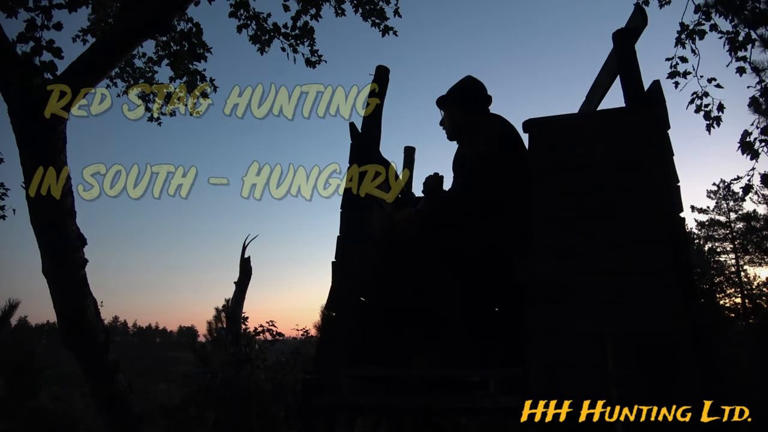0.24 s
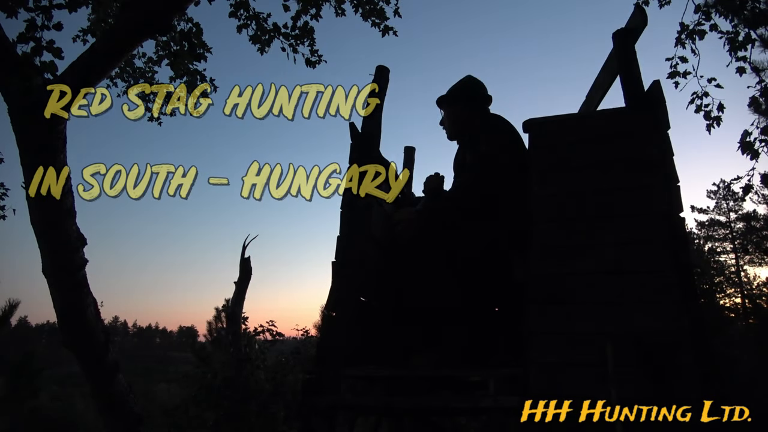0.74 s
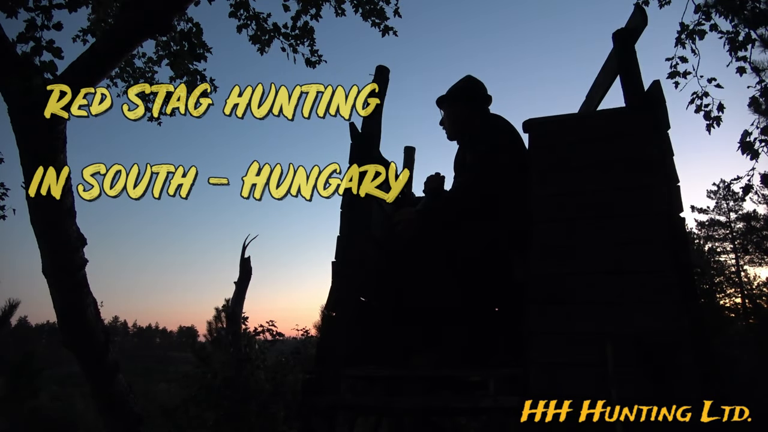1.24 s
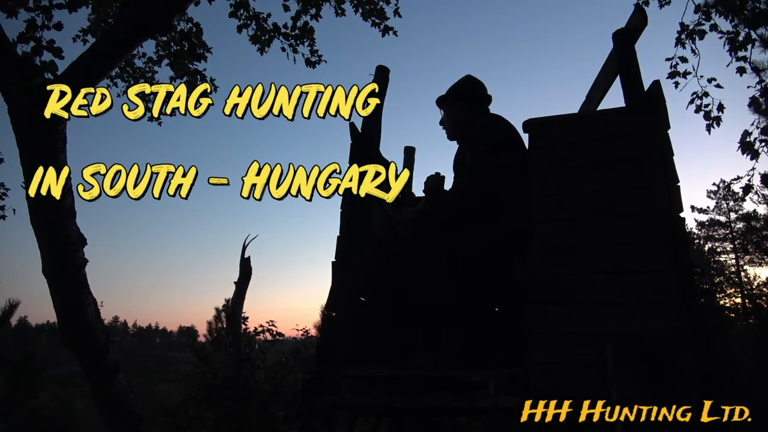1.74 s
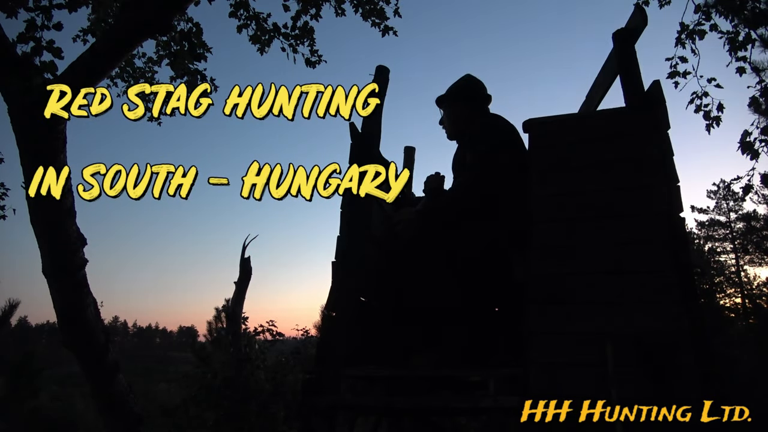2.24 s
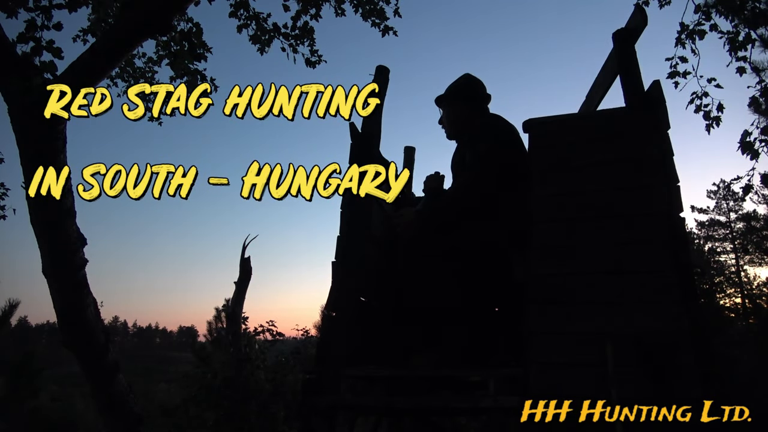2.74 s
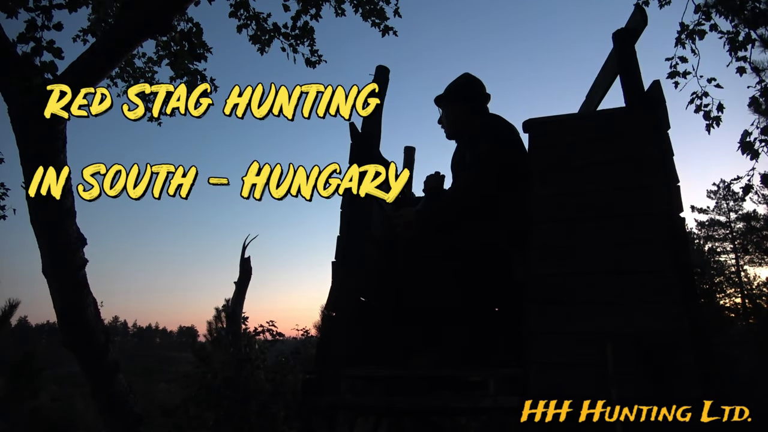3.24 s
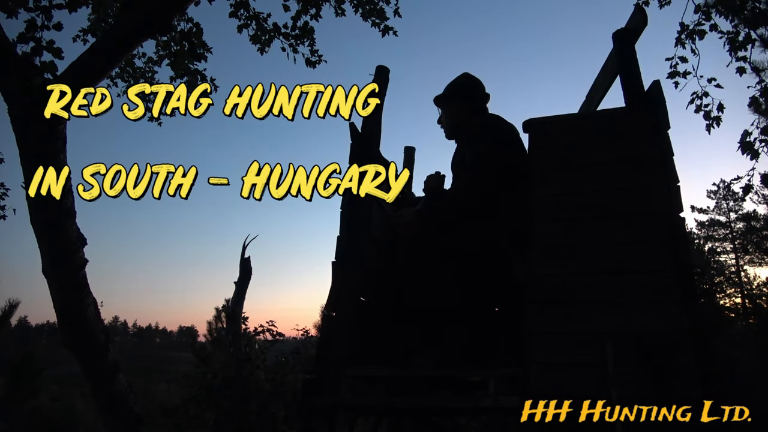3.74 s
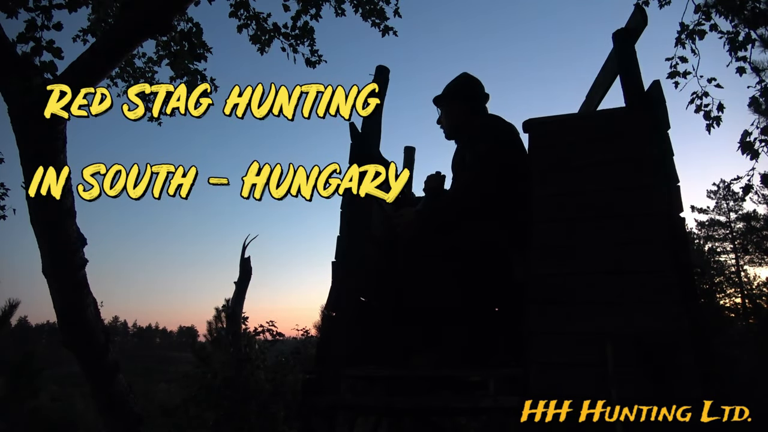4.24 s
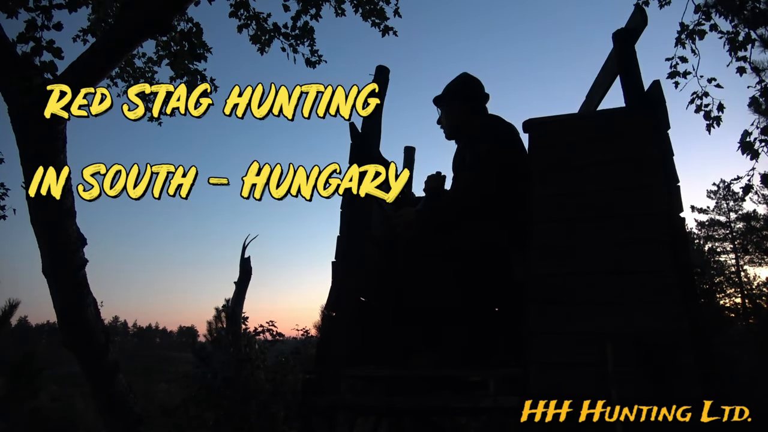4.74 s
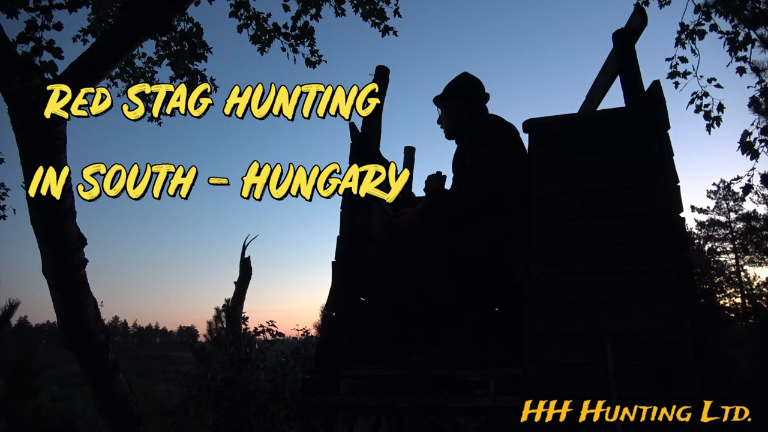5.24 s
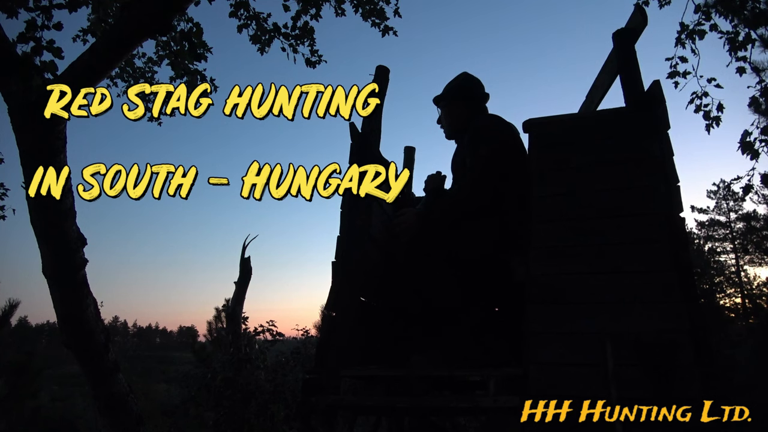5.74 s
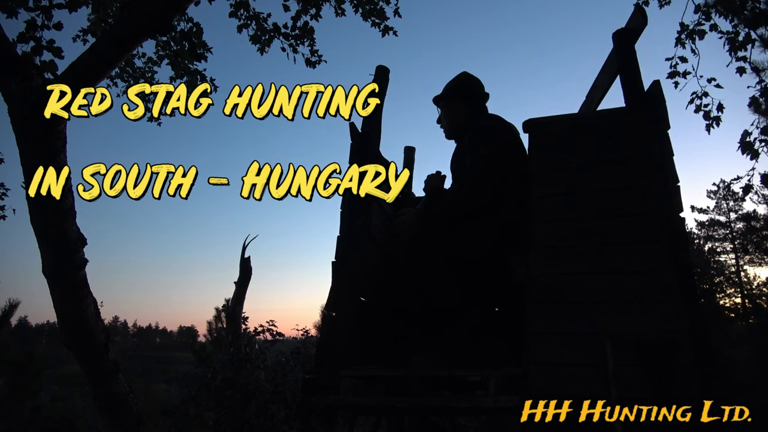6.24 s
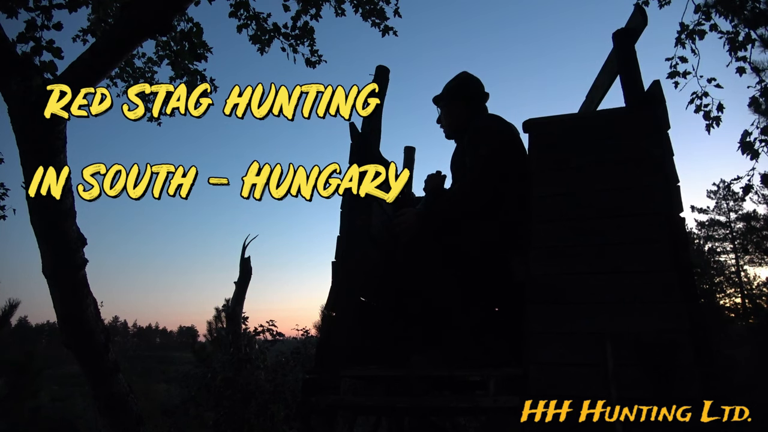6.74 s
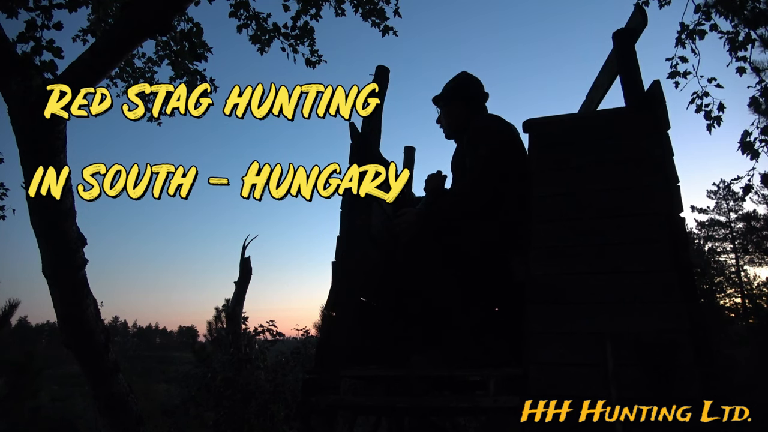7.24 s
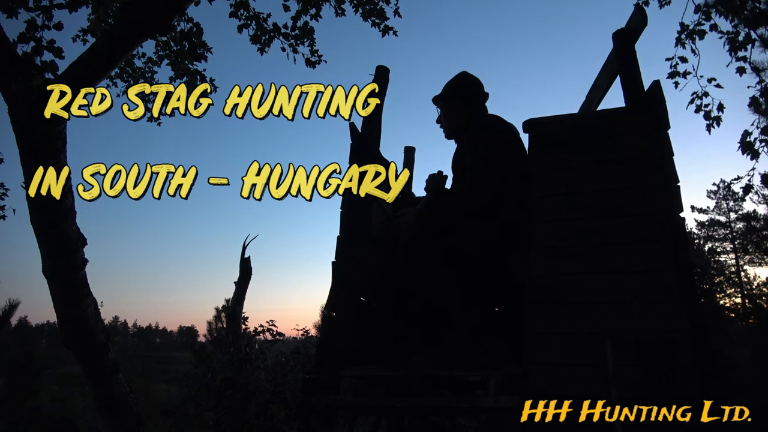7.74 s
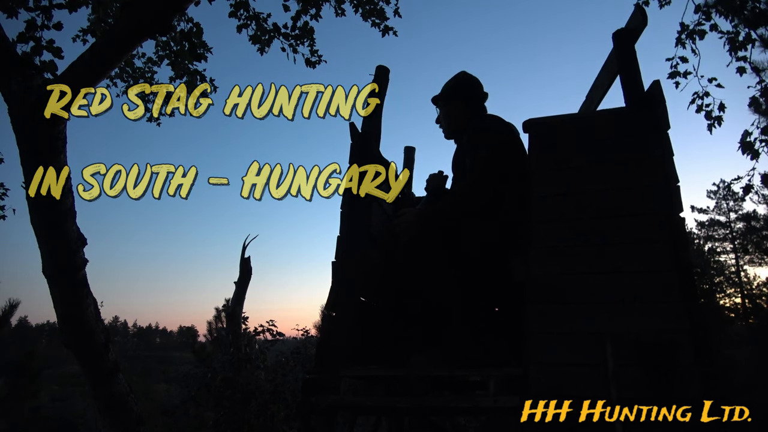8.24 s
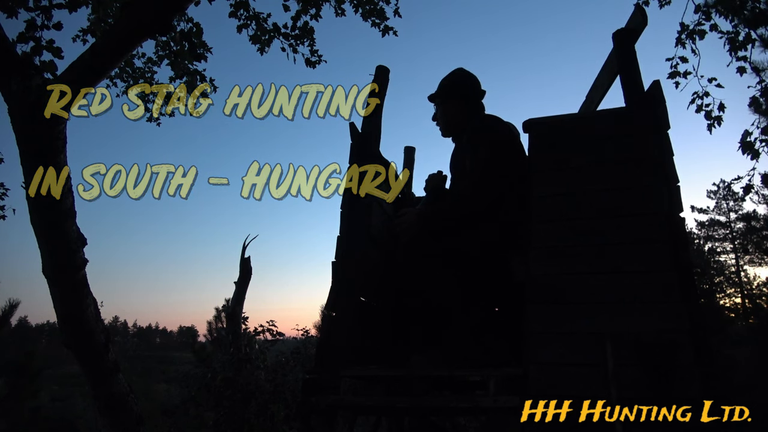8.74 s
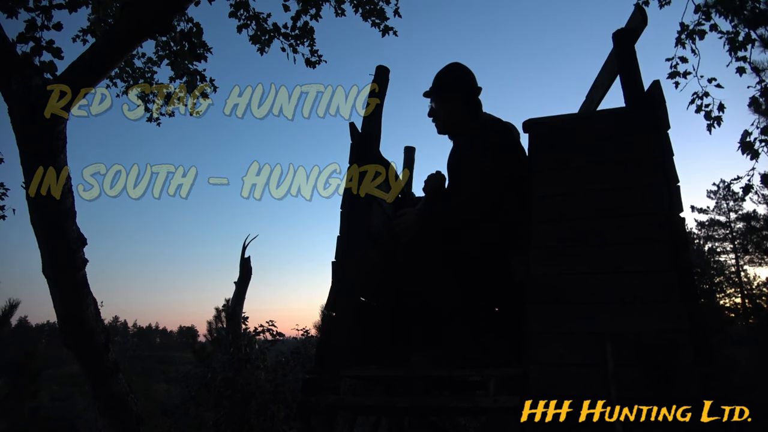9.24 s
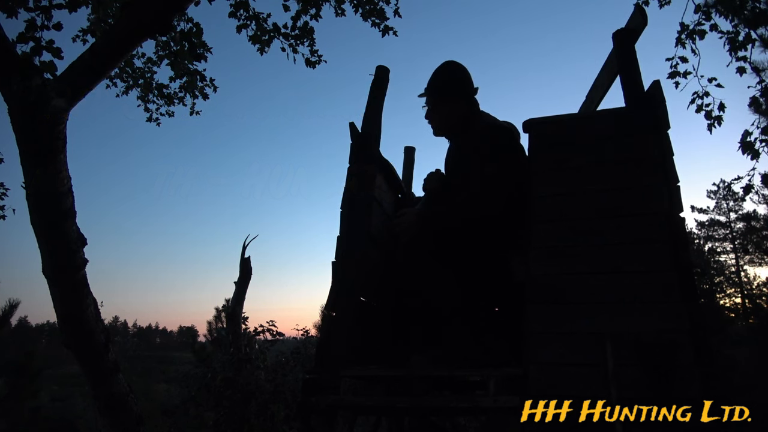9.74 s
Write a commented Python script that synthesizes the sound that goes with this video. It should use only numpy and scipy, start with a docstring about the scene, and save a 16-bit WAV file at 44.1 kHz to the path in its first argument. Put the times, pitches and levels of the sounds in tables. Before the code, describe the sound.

Outdoors in a wood, air rumbles steadily on the microphone while crickets trill faintly. From a distance a stag gives two rasping roars, then a drawn-out groan, then four short throaty roars in a row, each dropping in pitch at its end and echoing lightly through the trees. Nearby, twigs now and then tick or snap quietly, and there are a few soft rustles.

```python
"""Seven roars of a red deer stag at a forest edge at dusk: two harsh ones, a long groan, four short ones.
His vocal folds pulse through a long throat, whose resonances (the pitches it boosts) sink as he
stretches his neck; the trees echo faintly. Close by are a low rumble of air, soft rustles,
tree crickets trilling with their wings, and a few ticks and snaps of twigs."""
import sys
import numpy as np
from scipy import signal
from scipy.fft import rfft, irfft
from scipy.io import wavfile
from scipy.ndimage import uniform_filter1d

SR = 44100
rng = np.random.default_rng(int(sys.argv[2]) if len(sys.argv) > 2 else 0)


def pcm_store(signal):
    """Save signal as 16-bit PCM."""
    levels = np.round(np.clip(np.atleast_2d(signal), -1, 1) * 32767)
    wavfile.write(sys.argv[1], SR, levels.astype(np.int16).T)


N = 440118
TIME = np.arange(N) / SR


def from_db(db):
    """Turn decibels into a gain."""
    return 10 ** (np.asarray(db) / 20)


def rms_one(x):
    """Scale a signal so that its average size (rms) is 1."""
    return x / np.sqrt(np.mean(x ** 2) + 1e-20)


def in_time(rows):
    """Join timed points with straight lines, one curve for each column after the time."""
    times, *columns = np.transpose(rows)
    return [np.interp(TIME, times, column) for column in columns]


def butter(x, hz, kind, order=2):
    """Keep the lows, the highs or a band; a higher order cuts more steeply."""
    sections = signal.butter(order, np.clip(hz, 10, .45 * SR), kind, fs=SR, output="sos")
    return signal.sosfilt(sections, x + 1e-18)


def drift(rate):
    """A random wobble of average size 1 that turns about `rate` times a second."""
    return rms_one(np.interp(TIME * rate, np.arange(8000), rng.standard_normal(8000)))


def noise(spectrum):
    """Noise of average size 1, coloured by rows of f/Hz, relative level/dB."""
    hz, db = np.transpose(spectrum)
    bins = np.maximum(np.fft.rfftfreq(N, 1 / SR), 1)
    colour = from_db(np.interp(np.log(bins), np.log(hz), db))
    return rms_one(irfft(rfft(rng.standard_normal(N)) * colour, N))


def resonate(x, hz, width_hz):
    """Make a signal ring at one pitch; a narrow width rings longer."""
    r = np.exp(-np.pi * width_hz / SR)
    feedback = [1, -2 * r * np.cos(2 * np.pi * hz / SR), r * r]
    return (1 - r * r) / 2 * signal.lfilter([1, 0, -1], feedback, x)


def bell(hz, centre_hz, width_hz, steep=1.8):
    """How much a resonance lets through: 1 at its centre, less to either side."""
    return (1 + (2 * (hz - centre_hz) / width_hz) ** 2) ** (-steep / 2)


def air(drone_db=-24, hush_db=-50):
    """Moving air rumbles under a steady low drone and the hush of the wood."""
    # colours of the rumble and the hush: f/Hz, relative level/dB
    rumble_colour = [(7.1, -19.5), (12, 3.5), (24, 1), (36, -3.5), (52, -1.15), (67, -12), (91, -21),
                     (151, -21), (240, -36), (310, -54), (530, -120)]
    hush_colour = [(120, -38.5), (200, -0.5), (244, -11.5), (371, -7), (506, -16), (890, -18), (1010, -26),
                   (1190, -21), (1560, -30.5), (1710, -26), (1950, -34.5), (2750, -31.5), (3010, -36.5),
                   (15500, -42.5)]
    # the rumble's slow rise and fall: t/s, gain/dB
    rumble_curve = [(0, -27), (1.2, -23.5), (4.3, -22.5), (6.8, -23), (7.2, -25.5), (9.98, -25.5)]
    low_noise = butter(noise(rumble_colour), 233, "low", order=4)
    rumble = from_db(in_time(rumble_curve)[0]) * butter(low_noise, 80.6, "low", order=5)
    drone = from_db(drone_db) * butter(low_noise, 83.2, "high", order=5)
    hush = from_db(hush_db) * butter(noise(hush_colour), 157, "high")
    return rumble + drone + hush


def rustling(grain_db=1.0):
    """Soft, grainy rustles swell and die away."""
    # rustles: t/s, level/dB, time to rise 20 dB/s, time to fall 20 dB/s (negative: keeps growing)
    rustles = [(1.62, -53.5, 0.5645, 1.7), (6.31, -58, 0.5, 0.7), (7.42, -56, 0.03, 0.4),
               (9.0, -62.5, 2.3, 0.5), (9.95, -55.5, 0.95, -3.5)]
    # their colour: f/Hz, relative level/dB
    colour = [(300, -10), (700, 15), (1400, 9), (2500, 1.5), (4200, -1.5), (6500, -23), (11000, -8.5),
              (16000, -33)]
    swells = sum(from_db(db - 20 * np.maximum((at - TIME) / rise_s, (TIME - at) / fall_s))
                 for at, db, rise_s, fall_s in rustles)
    return swells * from_db(grain_db * drift(75)) * butter(noise(colour), 250, "high")


def crickets(strokes_per_s=40, waver=0.016, fade_s=0.056):
    """Tree crickets: each wing stroke is a short, nearly pure tone."""
    # trills: start/s, end/s, f/Hz, relative level/dB
    trills = [(-.1, 0.526, 2590, -63.5), (0.244, .82, 2760, -69), (1.547, 2.15, 2635, -65),
              (2.597, 3.195, 2770, -67.5), (8.219, 8.947, 2665, -67), (9.448, 10.006, 2793, -68.5)]
    out = np.zeros(N)
    for start, end, hz, db in trills:
        fade = np.clip(np.minimum(TIME - start, end - TIME) / fade_s, 0, 1)
        strokes = np.sin(np.pi * strokes_per_s * (TIME - start)) ** 2
        tone = np.sin(2 * np.pi * np.cumsum(hz * (1 + waver * drift(180))) / SR)
        out += 2 * from_db(db) * fade * strokes * tone
    return out


def bursts(times, levels_db, t60):
    """Wood fibres give way in bursts of noise, each fading by 60 dB in t60 seconds."""
    out, t = np.zeros(N), TIME[:SR // 10]
    for start, db in zip(times, levels_db):
        at = int(start * SR)
        burst = from_db(db - 60 * t / t60) * rng.standard_normal(len(t))
        out[at:at + len(t)] += burst[:N - at]
    return out


def twig_ticks(ring_db=4, crackle_db=-9):
    """Each tick crackles and sets a twig ringing."""
    # ticks: t/s, relative level/dB
    ticks = [(4.274, -44.5), (4.366, -39.5), (4.432, -50.5), (4.4843, -47.5), (6.237, -47), (6.2892, -40),
             (6.4823, -42), (7.3347, -48), (9.074, -45)]
    # the twig's resonances: f/Hz, width/Hz, relative level/dB
    resonances = [(3740, 125, 5), (3973, 160, -13), (4750, 238.6, -25.5)]
    cracks = bursts(*np.transpose(ticks), t60=.025) + 1e-12 * rng.standard_normal(N)
    ring = sum(from_db(db + ring_db) * resonate(cracks, hz, width) for hz, width, db in resonances)
    return ring + from_db(crackle_db) * butter(cracks, [1500, 7000], "band")


def twig_snaps(t60=.009):
    """Dry twigs snap without ringing: a broad body of noise and a little treble."""
    # snaps: t/s, level before filtering/dB, top of the body/Hz, treble offset/dB
    snaps = [(.763, -25.5, 1300, -46), (.946, -25.5, 1500, -45), (4.278, -31, 1400, -36),
             (6.187, -31, 1800, -34), (6.289, -41, 2800, -10), (6.575, -31, 2600, -21),
             (8.812, -24.5, 1700, -32), (9.311, -34, 2800, -20), (9.444, -35, 2800, -19),
             (9.617, -23, 1900, -32), (9.789, -36, 2800, -18), (9.893, -42, 2800, -2)]
    body = sum(butter(bursts([at], [db], t60), [450, top_hz], "band") for at, db, top_hz, _ in snaps)
    times, levels_db, _, treble_db = np.transpose(snaps)
    return body + butter(bursts(times, levels_db + treble_db, t60), 3500, "high")


def forest(x, near_db=-11, near_t60=0.39, far_db=-17, far_t60=2.64):
    """Near trunks scatter the sound at once; the far wood returns a thin, long echo."""
    t = TIME[:2 * SR]
    near, far = rng.standard_normal((2, len(t)))
    near = butter(near, 640, "high", order=1) * from_db(-60 * t / near_t60)
    far = butter(far, 600, "high", order=1) * from_db(-60 * t / far_t60) * (1 - np.exp(-t / 0.049))
    echo = from_db(near_db) * near / np.linalg.norm(near) + from_db(far_db) * far / np.linalg.norm(far)
    return x + signal.fftconvolve(x, echo)[:N]


def posed(posture, values):
    """Blend a value between three postures: 0 neck stretched, 1 relaxed, 2 mouth gaping."""
    return np.interp(posture, np.arange(3), values)


def throat(hz, rough, first_hz, posture, chest_db, tilt_db, strain_db=20):
    """How strongly the throat's first, second and upper resonances pass each frequency."""
    # the second resonance and its neighbour: f/Hz in each posture
    second_hz = (850, 979, 810)
    neighbour_hz = (893, 1108, 1166)
    # the neighbour grows as the mouth opens: relative level/dB in each posture
    neighbour_db = (-30, -7.5, 4.5)
    # upper resonances, one a row: f/Hz in each posture, width/Hz
    upper_bands = [(1445, 1510, 1640, 120), (1700, 1710, 1740, 90), (1850, 2000, 1900, 150),
                   (2280, 2310, 2200, 130), (2590, 2540, 2440, 130), (2810, 2800, 2800, 190),
                   (3600, 3400, 3400, 500)]
    # their strengths: relative level/dB in each posture
    upper_db = [(2.5, 3, 4), (6.5, -10.5, -6.5), (-14.5, -3.5, -17), (0, -4.5, -12), (-5.5, -12, -15),
                (-12, -14.5, -21.5), (-34.5, -33, -37)]
    # a gaping mouth damps the low resonances, making them wider
    damping = posed(posture, [1.3, 1, 4.0])
    # a strained voice drives the lowest resonance, the chest, harder
    chest_gain = from_db(posed(posture, (-10, -18, -8)) + chest_db + strain_db * np.minimum(rough, .35))
    chest = chest_gain * bell(hz, posed(posture, (295, 352, 345)), width_hz=100)
    first = bell(hz, first_hz, width_hz=48 * damping) + chest
    first /= np.sqrt((1 + (262 / hz) ** 16) * (1 + (hz / 800) ** 16))  # keep 262-800 Hz
    second = bell(hz, posed(posture, second_hz), width_hz=120 * np.sqrt(damping), steep=2.65)
    neighbour = bell(hz, posed(posture, neighbour_hz), width_hz=100, steep=2.2)
    second += from_db(posed(posture, neighbour_db)) * neighbour
    second /= np.sqrt((1 + (700 / hz) ** 16) * (1 + (hz / 1250) ** 24))  # keep 700-1250 Hz
    upper_power = 0
    for (*centres, width), db in zip(upper_bands, upper_db):
        peak = bell(hz, posed(posture, centres), width, steep=2.31)
        upper_power += (from_db(posed(posture, db)) * peak) ** 2
    return first, second, np.sqrt(upper_power) * from_db(tilt_db * np.log2(hz / 2000))


def roaring(onset_rough=0.3974, settle_s=0.0766, brighten_s=0.093, dull_s=0.032, flutter_db=1.3):
    """The stag's effort over time: in each roar his folds catch roughly, settle, then fray."""
    # one curve a roar: t/s, pitch/Hz, first resonance's level/dB, its f/Hz
    curves = [
        [(1.75, 74.4, -51, 450), (1.816, 75.1, -45, 596), (1.918, 75.6, -39.5, 524), (2.12, 114.4, -35.5, 445),
         (2.174, 134.8, -34.5, 435), (2.228, 138.9, -37.5, 453), (2.354, 142.1, -32, 464),
         (2.452, 136.6, -33.5, 440), (2.498, 121.5, -28.5, 452.3), (2.554, 90.27, -29.5, 460),
         (2.62, 76, -47, 459)],
        [(3.12, 100, -54.5, 464), (3.23, 98.03, -49.5, 470.5), (3.322, 111, -46.5, 445),
         (3.468, 106.4, -38, 645), (3.534, 107.1, -32.5, 477), (3.594, 124.7, -41, 430.5),
         (3.692, 138, -36, 439.8), (3.836, 137.3, -34, 437), (3.892, 133.6, -28, 422), (3.932, 123.2, -35, 432),
         (4.026, 91.3, -27.5, 462), (4.1, 75.87, -55, 449)],
        [(4.3, 103.9, -55.5, 543), (4.34, 103.7, -43.5, 578), (4.42, 117.2, -38.5, 583.4),
         (4.48, 118.2, -37, 581), (4.604, 110.1, -39, 600), (4.844, 111.4, -37.5, 545),
         (5.03, 104.2, -29, 509.6), (5.108, 101.5, -34, 494), (5.2, 99.5, -27.5, 497.8),
         (5.32, 107.5, -30.5, 532.4), (5.418, 113, -30.5, 560), (5.482, 110.7, -28.5, 558.5),
         (5.686, 112.4, -32, 558), (5.834, 107.8, -36, 525.4), (5.89, 98.7, -27.5, 595), (5.96, 87.9, -62, 590)],
        [(6.29, 98.7, -55, 493), (6.388, 112.8, -46.5, 513.7), (6.44, 115, -41, 480), (6.53, 113, -42.5, 514.8),
         (6.588, 102.4, -37.5, 540.8), (6.642, 82.2, -30.5, 560), (6.682, 76.3, -42.5, 514.4),
         (6.848, 78.49, -42, 445), (6.97, 65.7, -56.5, 469)],
        [(7.27, 88.7, -50, 504.3), (7.37, 106.4, -40, 590), (7.562, 108.4, -35.5, 523.5),
         (7.668, 106.6, -34, 532), (7.716, 101.5, -36, 540.5), (7.814, 87.6, -29.5, 542.6),
         (7.856, 81.4, -39, 519), (7.9, 71.73, -63, 510)],
        [(8.16, 84, -60.5, 456), (8.194, 87.3, -49, 596), (8.226, 87.29, -41, 595), (8.298, 93, -35.5, 551.8),
         (8.398, 91.8, -29, 548), (8.47, 86.2, -35, 490), (8.68, 79, -38.5, 475), (8.83, 67.51, -50, 471.7)],
        [(9.07, 80.2, -50, 566), (9.17, 92.12, -37.5, 558), (9.198, 94, -33, 560.7), (9.374, 95.4, -37.5, 539),
         (9.448, 90.1, -31, 521.8), (9.498, 78.2, -35, 515), (9.532, 74.1, -39.5, 530), (9.58, 72, -56.5, 516)],
    ]
    # one row a roar: middle of the neck stretch/s, its length/s, posture before, posture after,
    # held roughness (0-1), final roughness (0-1), fraying time/s,
    # chest, second and upper resonance offsets/dB, upper tilt/(dB per octave)
    roars = [ (1.964, 0.215, 0.82, 0.2, .15, 0.9, .1, 6, 0.5, 2, -9.5),
             (3.519, 0.35, 1.98, .2, 0.14, 0.77, .12, 8, -1, 0, 0.5),
             (4.869, 0.22, 1.56, 1, 0.05, 0.42, .07, 3.5, -.5, -1.5, -2.5),
             (6.64, 0.17, 1.82, 0.5, 0.03, 0.61, 0.25157, 6.5, 2, 1.5, -4),
             (7.727, 0.3696, 1.3, 0.60224, .04, 0.38, 0.13, 2.5, -0.5, .5, -1),
             (8.43, 0.30112, 1.306, 0.487, 0.02, .5, 0.23, 7, 0.5, -1, -2),
             (9.333, 0.42, 1.18, .92, 0.07, 0.49, 0.11, 7.5, -1, -3.5, 1), ]
    # second and upper resonances in an ordinary roar: level/dB in each posture
    usual_second_db = (-45.5, -50.5, -43)
    usual_upper_db = (-45.5, -49, -43.5)
    pitch, first_db, first_hz = in_time(np.vstack(curves))
    starts, ends = np.transpose([(curve[0][0], curve[-1][0]) for curve in curves])
    which = np.maximum(np.searchsorted(starts, TIME) - 1, 0)
    age, left = np.maximum(TIME - starts[which], 0), np.maximum(ends[which] - TIME, 0)
    (stretch_at, stretch_s, before, after, held, final, fray_s,
     chest_db, second_db, upper_db, tilt_db) = np.array(roars)[which].T
    posture = before + (after - before) * (1 + np.tanh(2 * (TIME - stretch_at) / stretch_s)) / 2
    catching = onset_rough * np.exp(-age / settle_s)
    fraying = (final - held) * np.exp(-left / fray_s)
    rough = np.clip(held + catching + fraying, 0, 1)
    # a voice higher or louder than the ordinary 100 Hz and -35 dB is brighter
    higher, louder = pitch - 100, first_db + 35
    second_db = second_db + posed(posture, usual_second_db) + 0.17 * higher + 0.33 * louder
    upper_db = upper_db + posed(posture, usual_upper_db) + 0.1922 * higher + 0.61 * louder
    # the brightness comes in late, flutters and leaves early
    bright = np.sin(np.pi / 2 * np.minimum(np.minimum(age / brighten_s, left / dull_s), 1)) ** 2
    second, upper = (bright * from_db(db + flutter_db * drift(16)) for db in (second_db, upper_db))
    controls = first_hz, posture, chest_db, tilt_db
    levels = from_db(first_db), second, upper
    return pitch, rough, controls, levels, np.minimum(age, left)


def stag(jitter=.05, waver=0.0019919, shimmer=0.64, swell_db=3.2, fade_s=0.016):
    """The throat shapes the overtones of the vocal folds; rough stretches pulse unevenly and rasp."""
    pitch, rough, controls, levels, to_edge_s = roaring()
    step = 128  # samples between updates of the overtones' strengths
    harmonics = np.arange(2, 46)
    hz = harmonics[:, None] * pitch[::step]
    # paths through the trees interfere, so each overtone swells and fades by itself
    slow_noise = uniform_filter1d(uniform_filter1d(rng.standard_normal(hz.shape), size=45), size=45)
    swell = from_db(swell_db * rms_one(slow_noise))
    shapes = [shape * swell for shape in throat(hz, rough[::step], *(c[::step] for c in controls))]
    gains = sum(level[::step] * shape / np.sqrt(np.sum(shape ** 2, axis=0) / 2)
                for level, shape in zip(levels, shapes))
    phase = 2 * np.pi * np.cumsum(pitch * (1 + jitter * rough * drift(70) + waver * drift(25))) / SR
    # rasp: swirling air shakes each overtone, the high ones most
    shake = rms_one(uniform_filter1d(rng.standard_normal((2, *hz.shape)), size=4))
    rasp = .4 * rough[::step] * (hz / 1000) ** .5
    gains = gains * (1 + rasp * (shake[0] + 1j * shake[1])) / np.sqrt(1 + 2 * rasp ** 2)
    gains *= np.exp(2j * np.pi * rng.random((len(harmonics), 1)))  # distance scrambles the phases
    cycle = np.exp(1j * phase)
    overtone, voice = cycle, np.zeros(N)
    for gain in gains:
        overtone = overtone * cycle  # the next overtone up
        voice += (np.interp(TIME, TIME[::step], gain) * overtone).real
    # strong and weak cycles alternate when the folds are strained
    voice *= 1 + shimmer * rough * drift(30) * np.cos(phase / 2)
    return voice * np.minimum(to_edge_s / fade_s, 1)


def scene():
    """The stag among the trees and the small sounds close by, in one channel."""
    return (forest(stag()) + crickets() + twig_ticks() + twig_snaps() + air() + rustling())[None]


def record(dry, cutoff_hz=15800):
    """The highest treble is cut off steeply."""
    return signal.sosfilt(signal.ellip(12, .1, 90, cutoff_hz, fs=SR, output="sos"), dry)


dry = scene()
out = record(dry)
pcm_store(out)
```